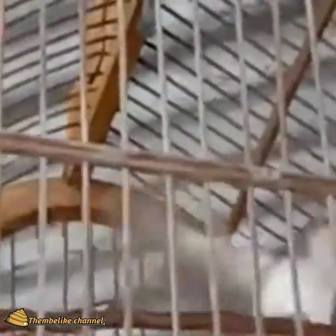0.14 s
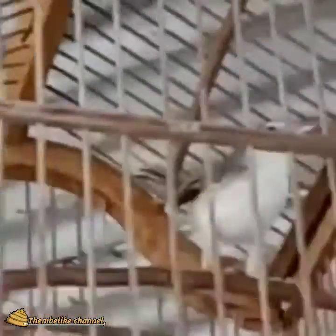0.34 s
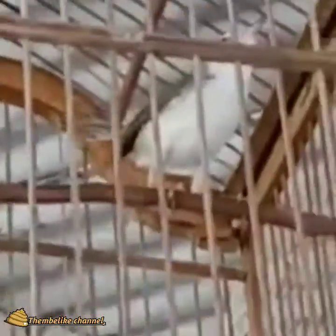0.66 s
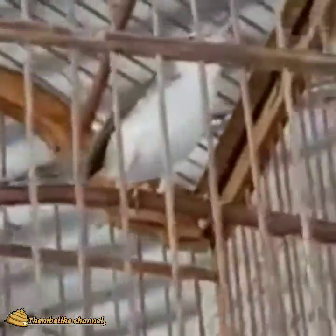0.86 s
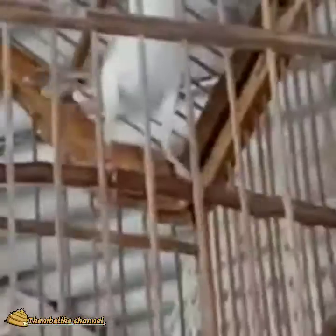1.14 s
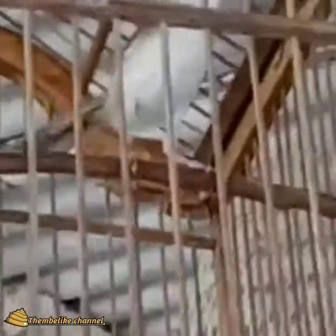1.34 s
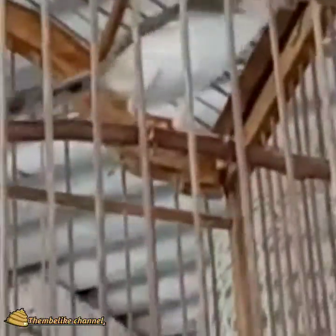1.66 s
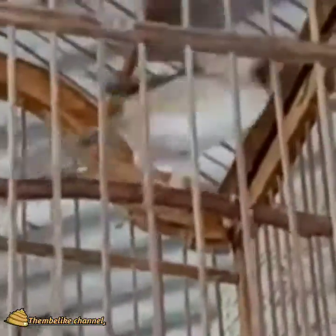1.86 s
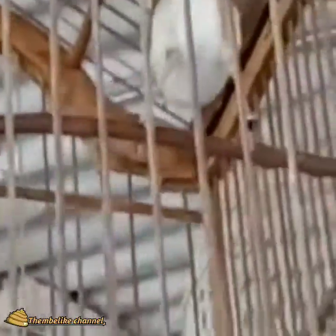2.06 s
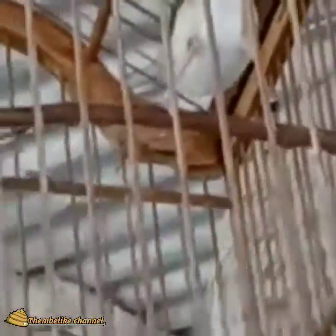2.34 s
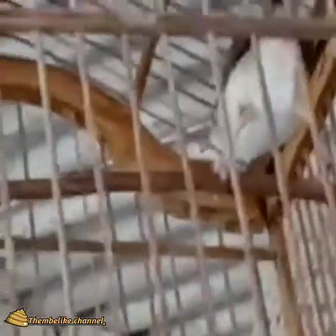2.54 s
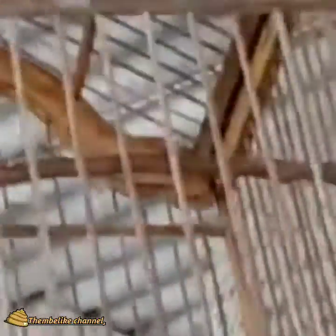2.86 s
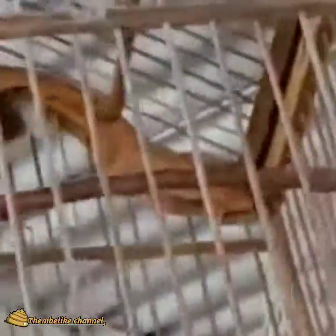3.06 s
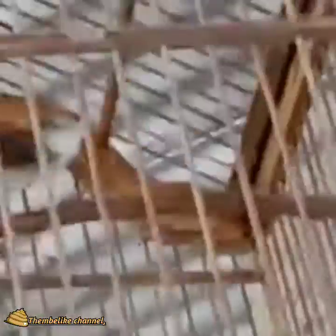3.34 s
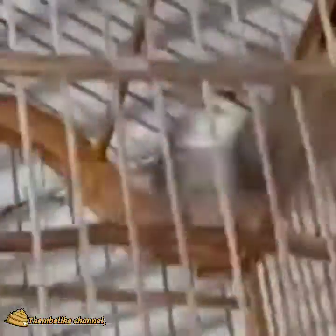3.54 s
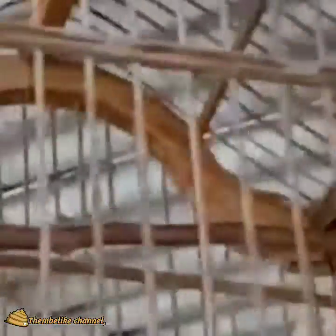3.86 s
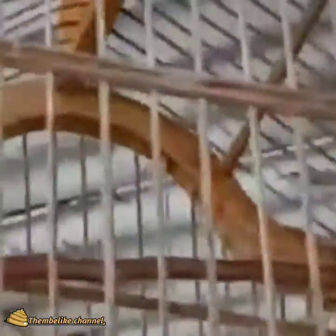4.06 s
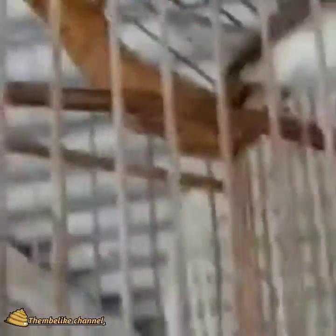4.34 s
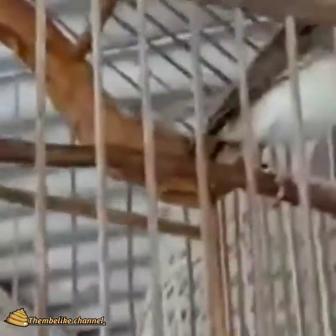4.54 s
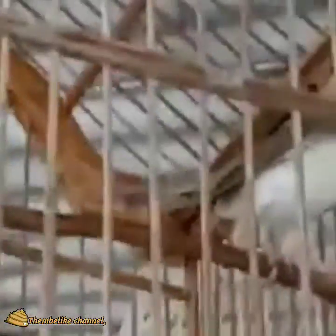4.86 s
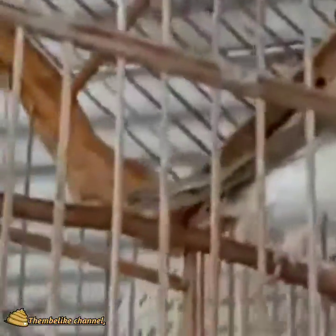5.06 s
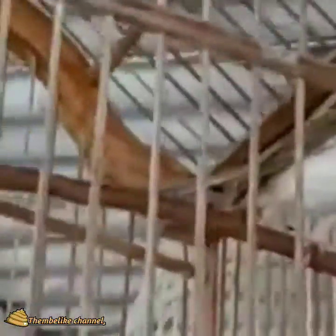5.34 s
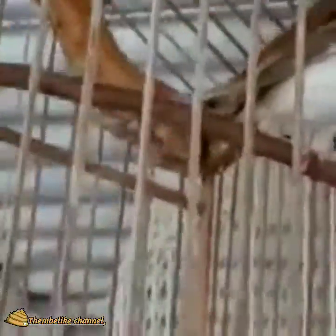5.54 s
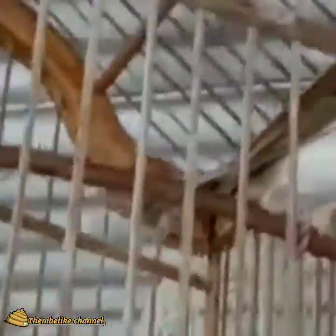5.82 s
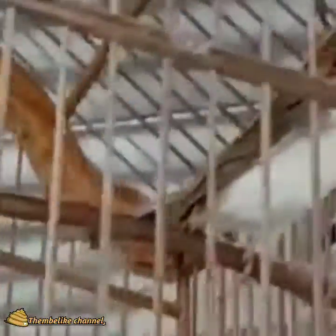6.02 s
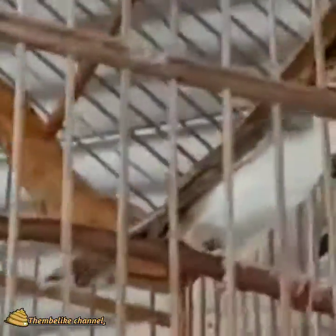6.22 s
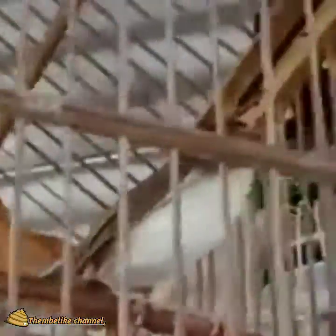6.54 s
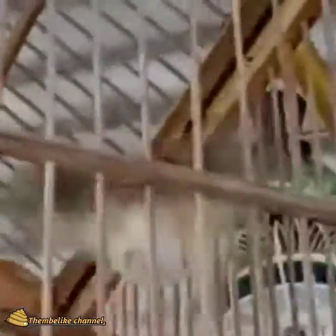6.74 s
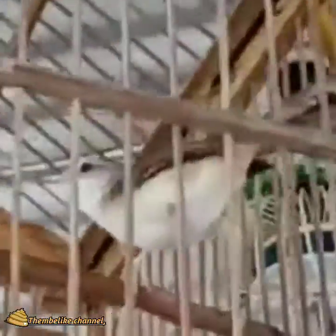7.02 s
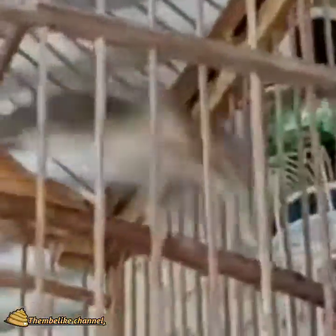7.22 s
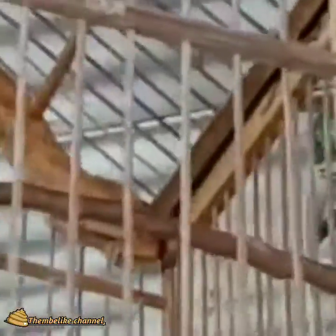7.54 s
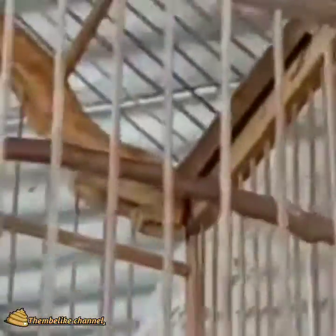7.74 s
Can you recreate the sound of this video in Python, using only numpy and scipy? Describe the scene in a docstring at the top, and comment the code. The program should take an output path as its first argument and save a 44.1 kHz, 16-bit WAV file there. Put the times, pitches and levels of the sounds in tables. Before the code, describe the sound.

A small bird in a wicker cage fires off steep, falling high chips in an even run, about six a second, each with a short bright echo under the porch roof. Around two and a half seconds one harsh, cracked squawk interrupts, then the chips resume to the end. Faint feather rustles, a claw tick and soft bumps lie beneath, with low rumble and airy background. Close stereo pickup, leaning left, pumping slightly around the loud notes.

```python
"""One steep downward chip, sung by a prinia in a wicker cage under a roof, repeats about six times a second.
Once a harsh, jumping squawk of overlapping rasping notes breaks into the run of gliding whistles.
Cage reflections and porch echoes answer every note; shaped noise makes the wing rustle and claw ticks,
and decaying perch modes make the knocks. Below lie soft bumps, a faint low rumble and the air of the yard.
A limiter ducks the whole scene around the loud notes."""
import sys
import numpy as np
from scipy import signal
from scipy.fft import rfft, irfft, next_fast_len
from scipy.io import wavfile
from scipy.ndimage import uniform_filter1d, minimum_filter1d, map_coordinates

SR = 44100
rng = np.random.default_rng(int(sys.argv[2]) if len(sys.argv) > 2 else 0)


def wrap_up_sound(samples):
    """Save the sound to the file named by the first command line argument, as 16-bit audio."""
    columns = np.atleast_2d(samples).T
    # keep every value between -1 and 1, then stretch to whole-number steps
    tamed = np.clip(columns, -1, 1)
    steps = np.round(tamed * 32767).astype(np.int16)
    wavfile.write(sys.argv[1], SR, steps)


N = 347949
TIME = np.arange(N) / SR

# Spectrum of the low rumble: [pitch_hz, relative_level_db per Hz]
RUMBLE_SPECTRUM = [(15, -49.5), (25, -15.5), (81, -6.5), (102, -5), (118, 3), (157, 1.5), (189, -8),
                   (305, -10), (436, -19.5), (505, -26), (600, -20.5), (780, -50), (1320, -120)]
# Slow rise and fall of the rumble: [time_s, level_db]
RUMBLE_LEVEL = [(0, -47.5), (1.1, -48), (1.45, -59), (2.3, -52.5), (2.9, -50.5), (3.4, -56), (4.25, -50.5),
                (4.6, -60), (5.3, -55.5), (5.7, -58), (6.2, -62.5), (7, -55.5), (7.89, -66)]
# Spectrum of the yard air: [pitch_hz, relative_level_db per Hz]
AIR_SPECTRUM = [(200, -20.5), (400, -5), (700, -8), (1100, -7), (1800, -5), (3000, 0), (5500, -17.5),
                (6800, -33.5), (8500, -49), (11500, -34), (14000, -50)]
# Slow rise and fall of the air: [time_s, level_db]
AIR_LEVEL = [(0, -57.5), (1.1, -50.5), (1.4, -64.5), (2.3, -57.5), (2.8, -60.5), (3, -45), (3.9, -64.5),
             (4.6, -50.5), (5.3, -61.5), (5.6, -66), (7.89, -59)]
# Soft low bumps: [centre_s, pitch_hz, bell_width_s, level_db]
BUMPS = [(1.04, 526, 0.018, -52), (1.053, 118.5, 0.058, -37.5), (2.35, 181.6, 0.028, -44.5),
         (2.644, 168.4, 0.0074, -27.5), (3.683, 139, 0.033, -43.5), (4.853, 244.2, 0.039, -51.5),
         (5.514, 341, 0.043, -56), (5.653, 326.6, 0.03, -57), (6.157, 307.4, 0.047, -52.5),
         (6.427, 225.4, .044, -48.5), (6.737, 253.7, 0.052, -51), (6.872, 621, 0.04, -63.5),
         (6.899, 408, 0.036, -60), (7.194, 95.7, 0.032, -50)]
# Feet striking the perch: [start_s, relative_level_db]
KNOCKS = [(7.348, -52), (7.38, -41), (7.388, -44)]
# Ringing modes of the wooden perch: [pitch_hz, relative_level_db, t60_s]
PERCH_MODES = [(257, -11, 0.065), (410, 3, 0.037), (550, -4, .02), (1274, -7, 0.059), (1880, -10, .02)]
# Wing flurries: [centre_s, bell_width_s, relative_level_db]
FLUTTERS = [(0.308, 0.028, -50.5), (1.237, 0.048, -50.5), (2.058, 0.04, -59), (2.93, 0.057, -55),
            (3.101, 0.015, -51.5), (3.246, 0.016, -56.5), (3.741, 0.056, -56.5), (4.524, 0.058, -59.5),
            (5.055, 0.072, -57.5), (5.294, 0.11, -52.5), (6.885, 0.038, -64), (7.374, 0.044, -55.5)]
# Spectrum of the rustling feathers: [pitch_hz, relative_level_db per Hz]
WING_SPECTRUM = [(100, -8), (300, 1.5), (600, -4), (1000, -10), (1700, -12), (4000, -12), (8000, -57.5),
                 (14000, -70)]
# Claws on the bars: [start_s, relative_level_db]
CLAW_TICKS = [(2.099, -53.5), (7.108, -46.5)]
# Reflections off the cage frame: [mean_delay_s, left_level_db, right_level_db]
CAGE_REFLECTIONS = [(.0021, -7.5, -9), (.003, -14, -10), (.0053, -12, -14), (.0076, -13, -17),
                    (.0097, -16, -17), (.012, -15, -16)]
# Where the bird sits: [time_s, left_port_lag_ms]
BEARING = [(0, .04), (.25, .042), (.85, .105), (1.7, .115), (2.2, .075), (3.4, .07), (3.7, .1), (5.8, .108),
           (6.7, .09), (7, .06), (7.5, .1)]
# Notes of the squawk:
# [start_s, length_s, start_hz, end_hz, relative_level_db, swell_db, rasp 0-1, fundamental_over_second_db]
SQUAWK_NOTES = [(2.565, .04, 1678, 1723, -9, 2.5, .35, 2), (2.6, 0.026, 1734, 1812, -1.5, 4.5, 0.4, -0.5),
                (2.62, 0.0097, 2158, 2320, -3, 2, .15, -6), (2.626, 0.0047, 2554, 2804, -4.5, 3.5, .1, -15),
                (2.631, 0.011, 2310, 2351, 1, 2.5, 0.4, -15.5), (2.636, .007, 2680, 2706, 6, 5, 0.08, -15),
                (2.643, 0.0091, 3000, 3300, 0.5, 3, .25, -22),
                (2.652, .011, 3333, 3011, 1.5, 1.5, .25, -19.5), (2.661, .019, 2253, 2146, 8.5, 5, 0, -7),
                (2.68, .011, 1874, 1928, 5, 0.5, 0.06, -22), (2.691, .012, 1922, 1930, 7, -3, 0, -23),
                (2.702, 0.019, 2647, 2624, -1.5, 2.5, 0.2, -3),
                (2.717, .023, 2202, 2189, 7, -0.5, 0.02, -20), (2.745, .016, 2170, 2189, 0.5, -2.5, 0, -20),
                (2.757, 0.0073, 1878, 1845, -2, -1, 0.05, -30)]
# Squawk overtones at full rasp: [harmonic_number, relative_level_db]
SQUAWK_OVERTONES = [(3, -1), (4, 1.5), (5, -1), (6, -3.5), (7, -3.5), (8, -5)]
# Throat and beak resonance: [pitch_hz, gain_db]
BEAK_RESPONSE = [(1000, -52), (1650, -25.5), (2100, -17.5), (2600, -3.5), (3400, -5.5), (4300, -3.5),
                 (5300, 1.5), (6900, -8.5), (7600, -21.5), (8500, -41.5), (9400, -28.5), (10500, -25.5),
                 (12700, -27.5), (15000, -47)]
# The run of chips:
# [mid_sweep_s, relative_level_db, brightness_db per octave, relative_length, onset_hz, echo_over_direct_db]
CHIPS = [(0.066, -16, 5, 1.29, 5620, -5.5), (0.2277, -18.5, 3, 0.9, 5990, -5),
         (0.3809, -13, 3, 1.27, 5560, -7), (0.5271, -14.5, 1.5, 1.15, 5900, -4),
         (0.6904, -17.5, 2.5, 1.19, 5720, -5), (0.8534, -18.5, 4, 1.25, 5440, -6),
         (1.0081, -17, -1.5, 1, 5660, -3.5), (1.1679, -16, 1.5, 1.21, 5660, -6),
         (1.3291, -20, 0, 1.09, 5560, -4), (1.4788, -17, .5, 1.13, 5700, -6),
         (1.6335, -16, 2, 1.3, 5480, -6), (1.7971, -16.5, 2, 0.93, 5620, -4),
         (1.9499, -16, 0.5, 1.03, 5670, -5.5), (2.1044, -20, 4, 1.23, 5920, -5),
         (2.2593, -17, 1, 1.1, 5640, -5), (2.4046, -19.5, 3, 0.97, 5930, -3.5),
         (2.553, -15, 6.5, 1.1, 5380, -3.5), (2.8583, -17, 5, 1.3, 5410, -6.5),
         (3.0227, -20.5, 2.5, 1.35, 5660, -3.5), (3.1725, -18, 1, 0.83, 5410, -6),
         (3.3253, -17.5, 2, 1.2, 5890, -4.5), (3.478, -15.5, 0, 1, 5500, -5.5),
         (3.6448, -20.5, 2, 1.29, 5800, -5), (3.8, -18, 4, 1.15, 5520, -6.5),
         (3.9582, -16, 3.5, 1.17, 5690, -6), (4.1227, -16.5, -1.5, 0.92, 5850, -5.5),
         (4.2861, -18.5, 1.5, 1.1, 5900, -4), (4.4501, -19.5, -0.3, 1.13, 5620, -4.5),
         (4.605, -16.5, 1.5, 1.3, 5720, -6), (4.7658, -17.5, -2.5, 1.1, 5750, -4),
         (4.9269, -18, -2, 1.13, 5680, -4.5), (5.0849, -17, 0.5, 1.17, 5910, -5),
         (5.2403, -18.5, -1, 1.23, 5610, -6), (5.3982, -19, -1, 1.23, 5610, -5.5),
         (5.5569, -17.5, 1, 1.07, 5670, -4.5), (5.7147, -16, 1.5, 0.93, 5550, -6),
         (5.8681, -19, 1, 0.91, 5680, -3.5), (6.0222, -17.5, 1, 1.05, 5640, -5),
         (6.1768, -18, -1.5, 0.92, 5720, -4), (6.3284, -18.5, -2, 1.09, 5780, -4),
         (6.4861, -17, 1.5, 1.33, 5490, -6), (6.6487, -17, -0.5, 1.1, 5490, -5.5),
         (6.7971, -12.5, 0.5, 1, 5560, -7), (6.9525, -14, 3.5, 1.2, 5400, -7),
         (7.1064, -17.5, -0.9, 1.2, 5860, -5), (7.2589, -14.5, 1, 1.21, 5710, -5.5),
         (7.41, -19, -4, 0.99, 6340, -5), (7.5671, -20, 0, 1.2, 5960, -4),
         (7.721, -16.5, -2, 1.19, 5770, -5), (7.884, -31.5, 26.5, 1.15, 5850, -5)]
# Shape shared by every chip: [from_mid_sweep_s at length 1, pitch_hz, relative_level_db]
SWEEP = [(-.0098, 6080, -12), (-.0063, 5400, -14.5), (-.0038, 5000, -7.5), (0, 4700, 1.5), (.0035, 3930, 2),
         (.007, 3240, -5.5), (.011, 2580, -19), (0.016, 2150, -34.5)]
# Colour of the left port against the right: [pitch_hz, left_over_right_db]
PORT_TILT = [(400, 0), (1300, 2), (2700, 2), (4200, -.3), (6000, -1.5), (11000, -4)]

RUMBLE_SWING_DB = 2
DIRECT_PAN_DB, ECHO_PAN_DB, YARD_PAN_DB = 4.8, 5, 7  # left over right
PORCH_T60_S, DECAY_SCATTER = 0.33, .03  # typical decay time; its log spread from note to note
BUILD_S = .008  # time constant of the wash building up
RING_DB = 2.3  # how unevenly the pitches ring out
WALL_COUNT, WALL_FIRST_S, WALL_LAST_S = 9, .018, .085  # distinct slaps off walls and roof
WALL_SHARE = .14  # their share of the echo energy
DAMP_HZ, DAMP_DB_PER_S = 6060, 110  # the treble above this dies this much faster
SCATTER_DB, SCATTER_T60_S = -8, .035  # each note scatters briefly off the thin bars
SQUAWK_ECHO_DB = -5
BEATING = .5  # depth of the rough flutter at full rasp
HISS_DB, CLEAR_HISS = -6.5, .3  # hiss at full rasp; share of it left in a clear note
CHIP_DB = 13  # common lift of all chips
ONSET_SPAN_HZ, ONSET_DB = 370, 12.5  # the voice swells by this much per span as it falls
UNSTEADY_DB = 1  # flicker of strength within a chip
LIMIT_DB, RELEASE_DB_PER_S, LOOK_AHEAD_S = -12.5, 113, 0.0035
TOP_HZ = 15300


def amp(db):
    """Decibels to gain."""
    return 10 ** (np.asarray(db) / 20)


def unit(x):
    """Scale to rms 1."""
    return x / np.sqrt(np.mean(x ** 2) + 1e-20)


def curves(rows, t=TIME):
    """Each column after the first, joined by straight lines."""
    s, *cols = np.transpose(rows)
    return [np.interp(t, s, c) for c in cols]


def wobble(rate, size=N):
    """A smooth random curve with rate knots a second."""
    knots = rng.standard_normal(int(size * rate / SR) + 4)
    steps = np.arange(0, len(knots) - 1, 1 / 8)
    smooth = map_coordinates(knots, [steps])
    return np.interp(np.arange(size) * rate / SR, steps, smooth)


def filtered(x, response):
    """x times a response of frequency."""
    m = next_fast_len(N + 8192)
    return irfft(rfft(x, m) * response(np.fft.rfftfreq(m, 1 / SR)), m)[..., :N]


def coloured(x, points):
    """x shaped by (Hz, dB) points on a log axis."""
    f, db = np.transpose(points)
    return filtered(x, lambda hz: amp(np.interp(np.log(hz + 1), np.log(f), db)))


def pan(db):
    """Left and right gains for a level difference."""
    return amp(np.array([[db], [-db]]) / 2)


def patchy(x, depth_db, size, order):
    """x with random gain patches, size frames long and order bins wide."""
    z = signal.stft(x, nperseg=1024)[2]
    field = uniform_filter1d(rng.standard_normal(z.shape[1:]), order, axis=0)
    field = uniform_filter1d(field, size, axis=1)
    return signal.istft(z * amp(depth_db * unit(field)), nperseg=1024)[1][:, :x.shape[1]]


def noise(points, spread):
    """Lumpy coloured stereo noise of rms 1; spread is the side-to-mid ratio."""
    lumpy = patchy(rng.standard_normal((2, N)), depth_db=4.5, size=7, order=2)
    mid, side = coloured(lumpy, points)
    return unit(np.array([mid + spread * side, mid - spread * side]))


def add(track, s, x):
    """Mix x into track from time s on."""
    i = round(s * SR)
    x = x[..., max(-i, 0):]
    part = track[..., max(i, 0):max(i, 0) + x.shape[-1]]
    part += x[..., :part.shape[-1]]


def swell(s, width):
    """A bell-shaped envelope around time s."""
    return np.exp(-.5 * np.minimum(((TIME - s) / width) ** 2, 100))


def background():
    """Two beds of shaped noise, low rumble and yard air, drift and waver in level."""
    (rumble_db,), (air_db,) = curves(RUMBLE_LEVEL), curves(AIR_LEVEL)
    low, high = noise(RUMBLE_SPECTRUM, spread=.3), noise(AIR_SPECTRUM, spread=.7)
    rumble = amp(rumble_db + RUMBLE_SWING_DB * wobble(16)) * low
    air = amp(air_db + 3.2 * wobble(18)) * high
    return (rumble + air) * pan(YARD_PAN_DB)


def bumps():
    """Dull, soft bumps: bell-shaped swells of narrow low noise."""
    out = np.zeros(N)
    for s, hz, width, db in BUMPS:
        t = np.arange(-3 * width, 3 * width, 1 / SR)
        # slow random curves on a carrier make a narrow noise band
        drift = wobble(70.3, len(t)) + 1j * wobble(70.1, len(t))
        band = drift * np.exp(2j * np.pi * hz * t)
        add(out, s + t[0], amp(db) * unit(band.real) * np.exp(-.5 * (t / width) ** 2))
    return out * pan(2.4)


def knocks():
    """The bird's feet set off decaying modes of the wooden perch, a short, dry knock."""
    out, t = np.zeros(N), np.arange(SR // 8) / SR
    attack = 1 - np.exp(-t / 0.00046)
    for s, db in KNOCKS:
        knock = np.zeros(len(t))
        for hz, mode_db, t60 in PERCH_MODES:
            # each strike excites the modes a little differently
            level = amp(db + mode_db + rng.normal(0, 3) - 60 * t / t60)
            knock += level * np.sin(2 * np.pi * hz * t)
        add(out, s, knock * attack)
    return out * pan(YARD_PAN_DB)


def wing_flurries():
    """Feathers rustle in short flurries of unsteady shaped noise."""
    flurries = sum(amp(db) * swell(s, width) for s, width, db in FLUTTERS)
    rustle = flurries * amp(1.5 * wobble(70)) * noise(WING_SPECTRUM, spread=0.61)
    return amp(4.0) * rustle * pan(YARD_PAN_DB)


def claw_ticks():
    """Claws tick on the bars: bursts of white noise that die 60 dB in 20 ms."""
    out, t = np.zeros((2, N)), np.arange(SR // 20) / SR
    for s, db in CLAW_TICKS:
        add(out, s, amp(db + 8.5 - 60 * t / 0.02) * rng.standard_normal((2, len(t))))
    return out


def porch():
    """Porch echoes of nominal energy 1 at each port: distinct slaps in a clumpy, unevenly ringing wash."""
    t = np.arange(SR // 2) / SR
    t60 = PORCH_T60_S * np.exp(DECAY_SCATTER * rng.standard_normal())
    decay = amp(-60 * t / t60)
    wash = patchy(rng.standard_normal((2, len(t))), depth_db=RING_DB, size=16, order=2)
    wash = wash * amp(0.19 * wobble(350, len(t)))
    wash = wash * decay * (1 - np.exp(-t / BUILD_S))
    slaps = np.zeros_like(wash)
    for port in slaps:
        at = (rng.uniform(WALL_FIRST_S, WALL_LAST_S, WALL_COUNT) * SR).astype(int)
        port[at] = decay[at]
    echoes = np.sqrt(1 - WALL_SHARE) * unit(wash) + np.sqrt(WALL_SHARE) * unit(slaps)
    echoes = echoes / np.sqrt(len(t))
    low = signal.sosfiltfilt(signal.butter(N=6, Wn=DAMP_HZ, fs=SR, output="sos"), echoes)
    return low + (echoes - low) * amp(-DAMP_DB_PER_S * t)


def heard(x, s, echo_db):
    """A note at the two ports: direct and cage, with porch echoes and bar scatter drawn afresh for every note."""
    paths = porch() * amp(echo_db) * pan(ECHO_PAN_DB)
    # direct sound, with a fractional delay between the ports
    lag_ms, = curves(BEARING, s)
    taps = np.arange(-16, 17) - np.array([[lag_ms], [-lag_ms]]) / 2 * SR / 1000
    width = taps.shape[1]
    paths[:, :width] += pan(DIRECT_PAN_DB) * np.sinc(taps) * np.hanning(width)
    # brief scatter off the thin bars
    scatter = rng.standard_normal(paths.shape) * amp(-60 * TIME[:paths.shape[1]] / SCATTER_T60_S)
    paths += amp(SCATTER_DB) * pan(DIRECT_PAN_DB) * scatter / np.linalg.norm(scatter[0])
    # frame reflections, their delays jittered from note to note
    left, right = pan(DIRECT_PAN_DB)[:, 0]
    for delay, left_db, right_db in CAGE_REFLECTIONS:
        at = np.abs(delay * SR * (1 + 0.069 * rng.standard_normal(2))).astype(int)
        paths[0, at[0]] += left * amp(left_db)
        paths[1, at[1]] += right * amp(right_db)
    return signal.fftconvolve(x[None], paths, axes=1)


def squawk():
    """A strained call: short notes overlap and jump between registers, rasp, then clear into a held whistle."""
    call = np.zeros((2, N))
    for s, length, start_hz, end_hz, db, swell_db, rasp, fundamental_db in SQUAWK_NOTES:
        u = np.linspace(0, 1, int(length * SR))
        strain = np.sqrt(rasp)
        hz = start_hz + (end_hz - start_hz) * u
        phase = 2 * np.pi * np.cumsum(hz * (1 + 0.025 * rasp * wobble(900, len(u)))) / SR
        # the second harmonic carries the whistle; the overtones grow with the strain
        overtones = sum(amp(level) * np.sin(k * phase) for k, level in SQUAWK_OVERTONES)
        stack = amp(fundamental_db) * np.sin(phase) + np.sin(2 * phase) + strain * overtones
        # chaotic beating of the membranes spreads each harmonic into a band, over a hiss
        beating = 1 + BEATING * strain * wobble(700, len(u))
        hiss_gain = amp(HISS_DB) * (CLEAR_HISS + (1 - CLEAR_HISS) * strain)
        voice = stack * beating + hiss_gain * rng.standard_normal(len(u))
        note = amp(db + swell_db * (u - 2.5)) * voice * signal.windows.tukey(len(u), .2)
        add(call, s, heard(note, s, SQUAWK_ECHO_DB))
    return coloured(call, BEAK_RESPONSE)


def chips():
    """Each chip is a nearly pure whistle that falls an octave and a half in about 30 ms."""
    out = np.zeros((2, N))
    earlier = (-.09, *CHIPS[0][1:])  # the run is already under way: the chip before still echoes
    for s, db, bright_db, length, onset_hz, echo_db in [earlier, *CHIPS]:
        t = np.arange(SWEEP[0][0] * length, SWEEP[-1][0] * length, 1 / SR)
        hz, shape_db = curves(SWEEP, t / length)
        hz = hz * (1 + 0.009 * wobble(350, len(t)))
        phase = 2 * np.pi * np.cumsum(hz) / SR
        onset_db = -ONSET_DB * np.maximum(1 + (hz - onset_hz) / ONSET_SPAN_HZ, 0)
        flicker_db = UNSTEADY_DB * wobble(406, len(t))
        # the opening of the beak favours the high or the low end of the sweep
        beak_db = bright_db * np.log2(hz / 4200)
        level = amp(CHIP_DB + db + shape_db + onset_db + flicker_db + beak_db)
        level = level * signal.windows.tukey(len(t), .15)
        # a trace of second harmonic; the third emerges as the pitch drops
        second = amp(-77.5) * np.sin(2 * phase)
        third = amp(-54.0) * np.sin(3 * phase) / (1 + (hz / 4300) ** 20)
        tone = np.sin(phase) + second + third
        add(out, s + t[0], heard(level * tone, s, echo_db))
    return out


def scene():
    """The yard, the bird's movements and its voice together."""
    surroundings = background() + bumps()
    movements = knocks() + wing_flurries() + claw_ticks()
    return surroundings + movements + squawk() + chips()


def limiter(x):
    """The gain ducks just before each loud note and climbs back, which holds up the echo and pumps the bed."""
    power = np.abs(uniform_filter1d(x ** 2, SR // 200, axis=1)).max(axis=0)
    level_db = 10 * np.log10(power + 1e-12)
    ramp = RELEASE_DB_PER_S * TIME
    gain_db = np.minimum.accumulate(np.minimum(LIMIT_DB - level_db, 0) - ramp) + ramp
    ahead = max(int(LOOK_AHEAD_S * SR), 2)
    held_db = minimum_filter1d(gain_db, 2 * ahead)
    return x * amp(uniform_filter1d(uniform_filter1d(held_db, ahead), ahead))


def record(dry):
    """Two differently coloured ports, limited together, with soft ends and nothing above the band limit."""
    ports = []
    for x, side in zip(dry, (1, -1)):
        tilt = [(hz, side * db / 2) for hz, db in PORT_TILT]
        ports.append(coloured(x, tilt))
    edges = signal.windows.tukey(N, .0008)
    return filtered(limiter(np.array(ports)) * edges, lambda hz: hz < TOP_HZ)


dry = scene()
out = record(dry)
wrap_up_sound(out)
```